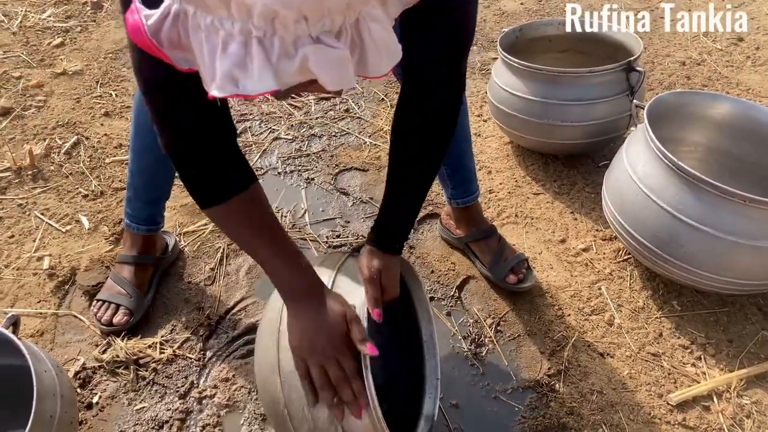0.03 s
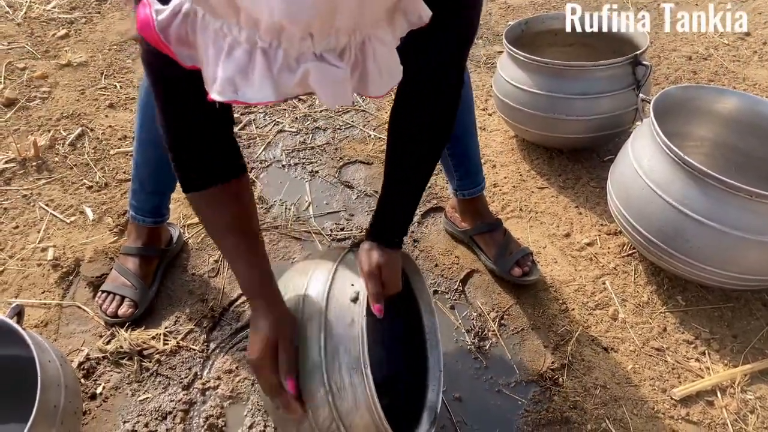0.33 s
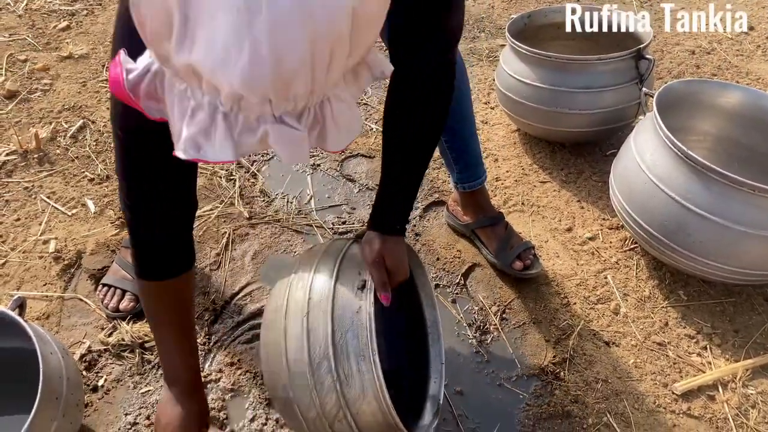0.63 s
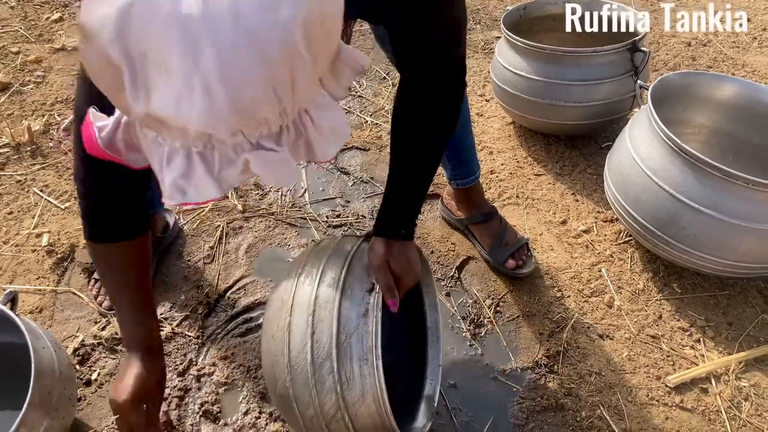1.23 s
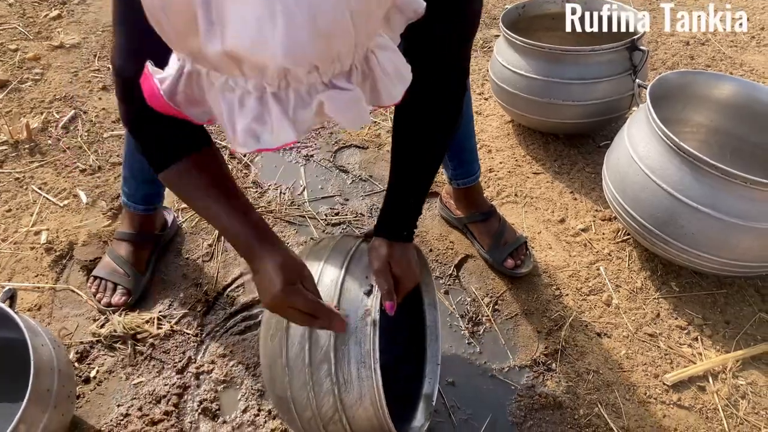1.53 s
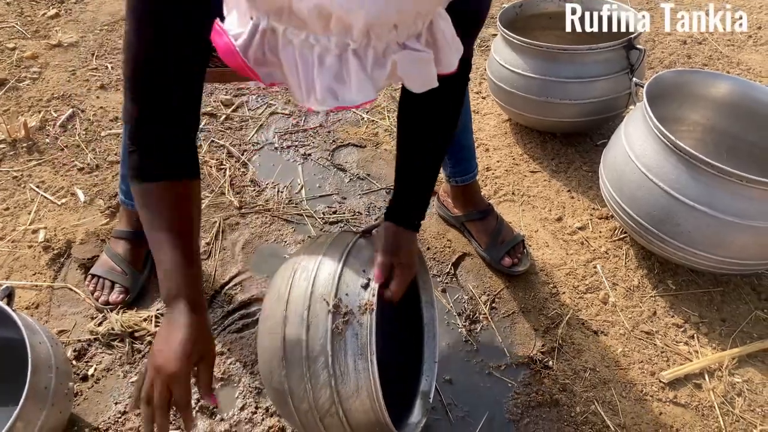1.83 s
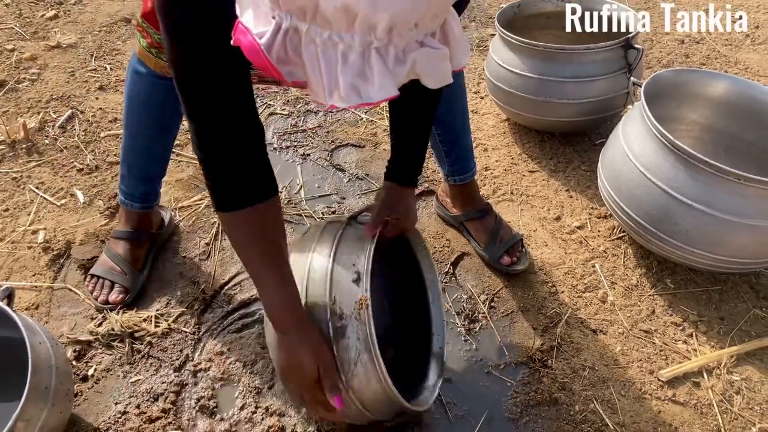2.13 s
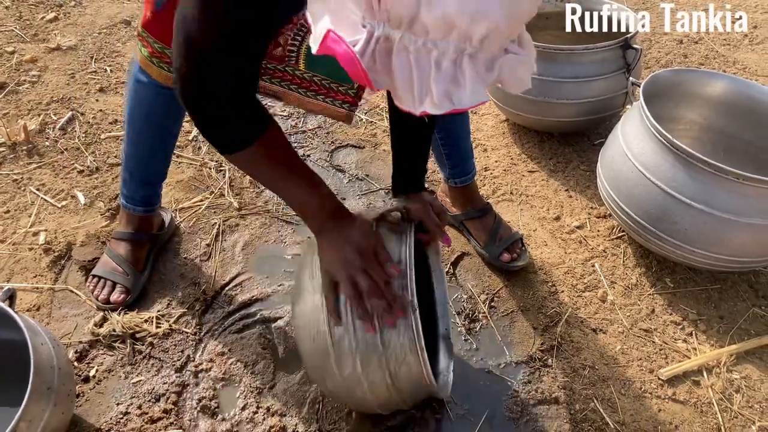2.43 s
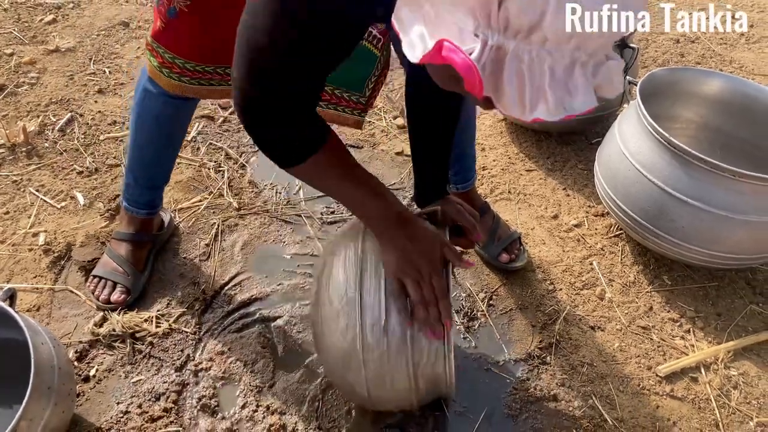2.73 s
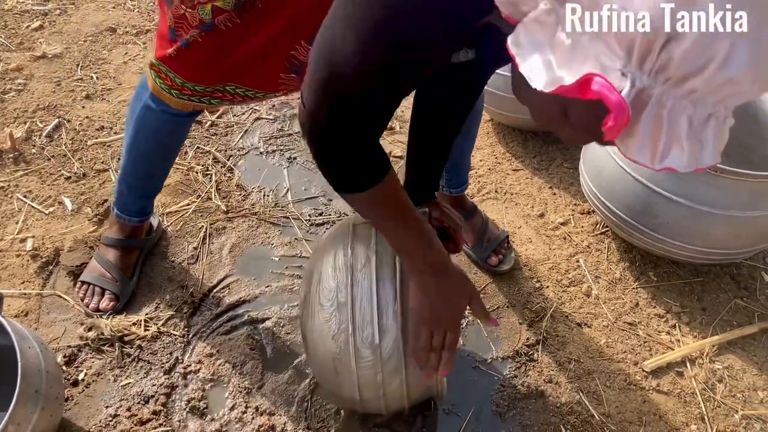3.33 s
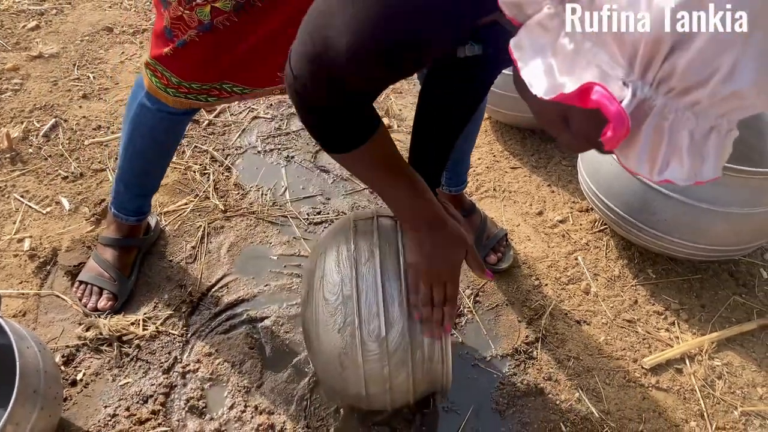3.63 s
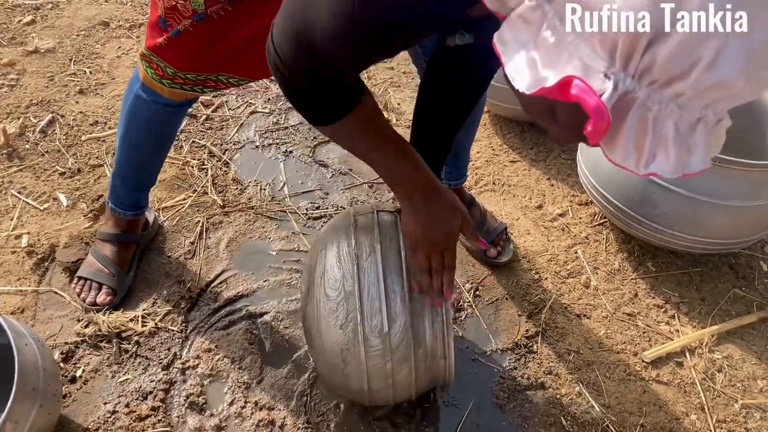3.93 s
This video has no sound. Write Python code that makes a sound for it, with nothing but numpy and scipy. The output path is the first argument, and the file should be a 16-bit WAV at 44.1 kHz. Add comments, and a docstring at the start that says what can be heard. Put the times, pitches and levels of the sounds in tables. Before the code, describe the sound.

A hand scrubs a metal pot with wet sand, making it ring hollowly. After two brief strokes and a pause, a light spatter and pat lead into louder, faster scraping. Wind rumbles on the microphone over faint outdoor hiss.

```python
"""Wet sand rasps in a ringing metal cooking pot, scoured by hand outdoors in gusty wind.
Two strokes, a pause to fetch sand, a sprinkle and a pat on the pot, then ever quicker strokes.
Sliding friction is a stream of tiny impacts: grains hiss under the palm, rasp on the wall,
chatter as they stick and slip, and force the pot's modes into vibration.
Turbulent gusts buffet the microphone over a soft hiss from the yard."""
import sys
import numpy as np
from scipy import signal
from scipy.fft import rfft, irfft
from scipy.io import wavfile
from scipy.ndimage import uniform_filter1d

SR = 44100
rng = np.random.default_rng(int(sys.argv[2]) if len(sys.argv) > 2 else 0)


def master(y):
    """Save y as 16-bit WAV."""
    cut = np.clip(np.atleast_2d(y).T, -1, 1)
    pcm = np.round(cut * 32767)  # scale
    wavfile.write(sys.argv[1], SR, pcm.astype(np.int16))


N = 176400
T = np.arange(N) / SR


def amp(db):
    """Decibels to amplitude ratio."""
    return 10 ** (np.asarray(db) / 20)


def unit(x):
    """Normalisation to rms 1."""
    return x / np.sqrt(np.mean(x ** 2) + 1e-20)


def colour(x, spectrum):
    """Spectral shaping by (frequency_hz, gain_db) points on a log frequency axis; rms 1."""
    hz, db = np.transpose(spectrum)
    gain_db = np.interp(np.log(np.fft.rfftfreq(N, 1 / SR) + 1), np.log(hz), db)
    return unit(irfft(rfft(x) * amp(gain_db), N))


def resonate(x, hz, width_hz, skirt_ratio=2.94):
    """Resonance at a fixed or gliding pitch; a second, wider pole steepens the skirts; rms 1."""
    carrier = np.exp(2j * np.pi * np.cumsum(hz * np.ones(N)) / SR)
    baseband = x / carrier
    for width in (width_hz, width_hz * skirt_ratio):
        pole = np.exp(-np.pi * width / SR)
        baseband = signal.lfilter([1 - pole], [1, -pole], baseband)
    return unit((baseband * carrier).real)


def steadied(x, window_s):
    """Division by the running rms evens out slow chance swells."""
    return x / np.sqrt(abs(uniform_filter1d(x ** 2, int(window_s * SR))) + 1e-6)


def arch(peak, rise, fall, edge_db=-20.5, roundness=2.08):
    """Near-Gaussian envelope of height 1, at edge_db one rise before and one fall after the peak."""
    near = slice(max(int((peak - 3 * rise) * SR), 0), int((peak + 3 * fall) * SR))
    t = T[near] - peak
    out = np.zeros(N)
    out[near] = amp(edge_db * np.where(t < 0, -t / rise, t / fall) ** roundness)
    return out


# Spectrum of the open air: frequency_hz, gain_db
AIR_SPECTRUM = [(100, 0), (400, -7), (800, -9.5), (1500, -11.5), (3000, -10), (6000, -22), (10000, -33.5),
                (16000, -41)]
def open_air(level_db=-64):
    """Stationary broadband noise: the faint, even sound of the outdoors."""
    return amp(level_db) * colour(rng.standard_normal(N), AIR_SPECTRUM)


# Spectrum of the yard's hiss: frequency_hz, gain_db
YARD_SPECTRUM = [(100, 6), (400, -13), (700, -10.5), (1000, -10), (1400, -2.5), (1750, -6.5), (2150, -3.5),
                 (2400, -2.5), (2850, 4), (3500, -1.5), (4300, -13.5), (6000, -25), (9000, -35.5),
                 (15000, -52)]
# Its swell and fade: time_s, level_db
YARD_SWELL = [(0, -67), (.3, -58.5), (.6, -56), (.83, -49.5), (.95, -53), (1.1, -50), (1.32, -56.5),
              (1.48, -53.5), (1.7, -56.5), (2.05, -63.5), (2.3, -63), (4, -61)]
def yard_hiss(waver_db=3):
    """Random amplitude modulation in patches of time and frequency makes a distant hiss waver."""
    noise = colour(rng.standard_normal(N), YARD_SPECTRUM)
    spectrogram = signal.stft(noise, nperseg=1024, noverlap=768)[2]
    patches = uniform_filter1d(rng.standard_normal(spectrogram.shape), size=6, axis=0)
    patches = unit(uniform_filter1d(patches, size=14, axis=1))
    hiss = signal.istft(spectrogram * amp(waver_db * patches), nperseg=1024, noverlap=768)[1][:N]
    return amp(np.interp(T, *np.transpose(YARD_SWELL))) * unit(hiss)


# Spectrum of the wind's rumble: frequency_hz, gain_db
WIND_SPECTRUM = [(10, 6.5), (28, 3), (60, 0), (105, -2.5), (150, -11), (200, -15.5), (300, -26.5),
                 (450, -40), (700, -49), (1500, -90)]
# Gusts on the microphone: peak_s, half_length_s, level_db
WIND_GUSTS = [(.01, 0.063, -33.5), (0.228, 0.14, -21.5), (0.453, 0.17, -23), (0.649, 0.077, -31.5),
              (0.896, 0.099, -21), (0.963, 0.027, -22.5), (1.054, 0.068, -26.5), (1.504, 0.033, -27.5),
              (1.79, 0.056, -16.5), (1.957, 0.14, -29), (2.271, 0.07, -30.5), (2.437, 0.27, -32.5),
              (2.587, 0.053, -15), (2.638, 0.11, -31), (2.816, 0.12, -29.5), (2.997, 0.071, -28),
              (3.093, 0.076, -27), (3.32, 0.35, -36), (3.596, 0.27, -27.5), (3.761, 0.15, -20.5),
              (4.0, 0.091, -29.5)]
def wind(breeze_db=-51.5):
    """Turbulent pressure makes a low rumble; gusts and breeze are incoherent, so their powers add."""
    gust_power = sum((amp(db) * arch(peak, half, half)) ** 2 for peak, half, db in WIND_GUSTS)
    rumble = steadied(colour(rng.standard_normal(N), WIND_SPECTRUM), window_s=0.071)
    return np.sqrt(amp(breeze_db) ** 2 + gust_power) * rumble


def grains(rate_per_s=11000, spread_db=2.5, clump_db=1.8, clump_hz=194):
    """Shot noise: sand grains of uneven size click at random and slip in clumps; rms 1."""
    clicks = (rng.random(N) < rate_per_s / SR) * rng.choice([-1, 1], N)
    sizes = amp(spread_db * np.minimum(rng.exponential(1, N), 5))
    low_pass = signal.butter(2, clump_hz, fs=SR, output="sos")
    clumps = unit(signal.sosfilt(low_pass, rng.standard_normal(N)))
    return unit(clicks * sizes * amp(clump_db * clumps))


# Sand caught under the palm: peak_s, half_length_s, from_hz, to_hz, level_db
SAND_CHATTERS = [(0.207, 0.046, 2060, 2730, -40.5), (.36, 0.056, 2190, 1940, -61),
                 (2.42, 0.033, 2120, 2190, -41), (2.815, 0.027, 1387, 1560, -33.5),
                 (3.195, .055, 1283, 1350, -29), (3.219, .035, 2100, 2260, -38),
                 (3.313, 0.031, 1440, 1150, -38), (3.353, 0.036, 993, 990, -31),
                 (3.343, 0.049, 2020, 2250, -39.5), (3.461, 0.05, 1340, 2110, -41),
                 (3.636, 0.036, 1570, 1470, -38.5), (3.179, 0.051, 3550, 2930, -38.5),
                 (3.72, 0.042, 2000, 1850, -52), (3.91, 0.043, 1630, 2230, -48)]
def chatter(relative_width=0.089):
    """Stick-slip friction turns the grain clicks into short, rough, gliding tones."""
    sand, out = grains(), np.zeros(N)
    for peak, half, from_hz, to_hz, db in SAND_CHATTERS:
        pitch_hz = np.interp(T, [peak - half, peak + half], [from_hz, to_hz])
        tone = steadied(resonate(sand, pitch_hz, relative_width * from_hz), window_s=0.051)
        out += amp(db) * arch(peak, half, half) * tone
    return out


# The pot's modes (a first pair, a second pair, then the upper ones): pitch_hz, width_hz, gain_db
POT_MODES = [(782.8, 28.3, -2), (803, 79, -10.5), (1503, 36, -4), (1548, 76, -7), (2367, 150, -7),
             (2420, 39, -7), (3220, 92, -3.5), (4026, 68, -21), (5110, 180, -24.5)]
# Grips of the palm, driving each group of modes: peak_s, rise_s, fall_s, first_db, second_db, upper_db
PALM_GRIPS = [(0.018, 0.12, 0.089, -51, -46.5, -43), (0.159, 0.052, 0.066, -35.5, -39.5, -42.5),
              (0.207, 0.044, 0.061, -38.5, -38, -40.5), (.34, .05, 0.09, -67, -58, -72),
              (2.149, 0.13, 0.083, -54, -60, -51.5), (2.355, 0.044, 0.091, -50, -49.5, -70),
              (2.428, 0.051, 0.065, -29.5, -44.5, -34), (2.58, 0.11, 0.099, -40, -42.5, -46.5),
              (2.807, 0.068, 0.045, -37.5, -39.5, -47), (2.849, 0.043, 0.06, -37.5, -43.5, -38),
              (2.962, 0.043, 0.052, -34, -60, -47), (2.998, 0.057, 0.1, -46, -36.5, -37),
              (3.161, 0.099, 0.1, -37.5, -47, -63), (3.244, 0.029, 0.034, -34.5, -34, -42.5),
              (3.33, 0.08, 0.063, -41, -41, -43), (3.465, 0.067, 0.07, -46.5, -40.5, -47.5),
              (3.525, 0.033, 0.043, -41, -57, -58), (3.618, 0.055, 0.06, -38, -54, -46),
              (3.755, 0.054, 0.085, -42, -49.5, -59), (3.876, 0.029, 0.04, -35.5, -50, -65)]
def pot_ringing(upper_stretch=0.68):
    """Forced vibration: where the palm grips, the grains drive the pot's hollow modes."""
    first, second, upper = np.zeros((3, N))
    for peak, rise, fall, first_db, second_db, upper_db in PALM_GRIPS:
        pressure = arch(peak, rise, fall)
        first += amp(first_db) * pressure
        second += amp(second_db) * pressure
        # the upper modes need firm pressure, so they sound more briefly
        upper += amp(upper_db) * arch(peak, rise * upper_stretch, fall * upper_stretch)
    drives = [first, first, second, second] + [upper] * (len(POT_MODES) - 4)
    sands, out = (grains(), grains()), np.zeros(N)
    for k, (hz, width_hz, db) in enumerate(POT_MODES):
        mode = steadied(resonate(sands[k % 2], hz, width_hz), window_s=0.039)
        out += amp(db) * drives[k] * mode
    return out


# Spectrum of loose sand: frequency_hz, gain_db
HISS_SPECTRUM = [(300, 5), (1000, -8), (2800, -32), (3600, -13), (4300, -1.5), (5700, 1.5), (6400, -2),
                 (7400, 1), (8500, -4.5), (10500, -6), (14000, -7.5), (16000, -7.5)]
def sand_hiss(clicks):
    """Filtered shot noise: dense clicks merge into the hiss of loose sand; rms 1."""
    return colour(clicks, HISS_SPECTRUM)


# Sand and hand landing on the pot: start_s, rise_s, ring_db, thud_db, spatter_db
LANDINGS = [(1.653, 0.033, -47.5, -79, -53), (2.079, 0.025, -38.5, -36.5, -77)]
def pats(ring_t60_s=0.11, thud_hz=258, thud_t60_s=0.089, spatter_rise_s=0.0062, spatter_t60_s=0.19):
    """Damped free vibration: soft impacts ring the lowest mode, with a thud and a spatter of sand."""
    spatter = sand_hiss(grains())
    pure = np.sqrt(2) * np.sin(2 * np.pi * POT_MODES[0][0] * T)
    rough = steadied(resonate(grains(), *POT_MODES[1][:2]), window_s=0.025)
    rough_share = 0.075
    ring = np.sqrt(1 - rough_share) * pure + np.sqrt(rough_share) * rough
    out = np.zeros(N)
    for start, rise, ring_db, thud_db, spatter_db in LANDINGS:
        t = np.maximum(T - start, 0)
        swell = np.minimum(t / rise, 1) ** 2
        decay_s = np.maximum(t - rise, 0)
        thud = np.sqrt(2) * np.sin(2 * np.pi * thud_hz * t)
        out += swell * amp(ring_db - 60 * decay_s / ring_t60_s) * ring
        out += swell * amp(thud_db - 60 * decay_s / thud_t60_s) * thud
        out += np.minimum(t / spatter_rise_s, 1) * amp(spatter_db - 60 * t / spatter_t60_s) * spatter
    return out


def wall(clicks, t60_s=0.049, ring_share=0.58, hand_turns_per_s=1.7):
    """Convolution with the hand-damped wall's impulse response, which varies as the contact moves."""
    t, ring = T[:SR // 12], np.zeros(N)
    for k in range(1, 5):
        response = rng.standard_normal(len(t)) * amp(-60 * t / t60_s)
        coupling = np.cos(2 * np.pi * (k * hand_turns_per_s * T + rng.random()))
        ring += coupling * signal.oaconvolve(clicks, response / np.linalg.norm(response))[:N]
    return np.sqrt(1 - ring_share) * clicks + np.sqrt(ring_share) * steadied(ring, window_s=0.066)


# Spectra of the wall's rasp, the sand's scrape and the palm's dull rub: frequency_hz, gain_db
RASP_SPECTRUM = [(200, 3), (450, -7.5), (620, -16), (850, 3.5), (1080, -7.5), (1250, -1.5), (1550, -4),
                 (1950, -9.5), (2300, -14), (2700, -26.5), (3250, -3), (4500, -7.5), (5500, -11),
                 (6500, -31), (9000, -24), (16000, -44)]
SCRAPE_SPECTRUM = [(1000, -22), (2800, -14), (3400, 3), (6000, -4.5), (9000, -19), (16000, -25)]
PALM_SPECTRUM = [(40, -12), (130, 0), (200, 0.5), (320, -6), (500, -26), (900, -38)]
# Strokes of the hand: peak_s, rise_s, fall_s, rasp_db, scrape_db, scrape_pitch_hz, hiss_db
HAND_STROKES = [(0.018, 0.15, .07, -50, -60, 4800, -56.5), (.2, 0.13, 0.071, -61, -59, 5000, -63),
                (.34, 0.068, 0.25, -66, -76, 3500, -70), (1.98, .04, 0.084, -70, -82, 5000, -71.5),
                (2.124, 0.03, 0.12, -56.5, -50.5, 4900, -50), (2.27, 0.13, 0.067, -75, -63, 5750, -53),
                (2.407, 0.09, 0.079, -63, -46.5, 4340, -41), (2.585, 0.079, 0.12, -47, -42, 5100, -36.5),
                (2.789, 0.068, 0.13, -44.5, -44, 4480, -41), (2.995, 0.077, 0.15, -39, -40.5, 5600, -37),
                (3.174, 0.058, 0.098, -33.5, -38.5, 4260, -38.5),
                (3.347, 0.044, 0.08, -39.5, -46.5, 4350, -48),
                (3.458, 0.029, 0.091, -35, -41.5, 4440, -48.5),
                (3.627, 0.045, 0.044, -39.5, -44, 4520, -55),
                (3.734, 0.084, 0.088, -43.5, -57.5, 3780, -60.5),
                (3.9, 0.055, 0.043, -43, -50.5, 3940, -60), (3.986, 0.038, 0.056, -50, -45.5, 3500, -75)]
def scouring(scrape_sag_per_s=0.45, hiss_lead_s=0.0082, hiss_stretch=1.095, rub_over_hiss_db=3):
    """Sliding friction: grains dragged over the wall rasp, scrape and hiss with the palm's pressure."""
    rasp_gain, scrape_gain, hiss_gain, weighted_hz, weight = np.zeros((5, N))
    for peak, rise, fall, rasp_db, scrape_db, hz, hiss_db in HAND_STROKES:
        pressure = arch(peak, rise, fall)
        rasp_gain += amp(rasp_db) * pressure
        scrape_gain += amp(scrape_db) * pressure
        # the pitch sags through each stroke; overlapping strokes average by pressure
        pitch_hz = hz * (1 - scrape_sag_per_s * np.clip(T - peak, -rise, fall))
        weighted_hz += (pressure + 1e-9) * pitch_hz
        weight += pressure + 1e-9
        # loose sand starts sliding just before the hand presses, and slides a little longer
        hiss_gain += amp(hiss_db) * arch(peak - hiss_lead_s, rise * hiss_stretch, fall * hiss_stretch)
    sand = grains()
    scrape = resonate(colour(wall(sand), SCRAPE_SPECTRUM), weighted_hz / weight, width_hz=750)
    firmness = (hiss_gain / hiss_gain.max()) ** 0.96  # the palm's rub needs firm pressure
    rub = amp(rub_over_hiss_db) * firmness * colour(sand, PALM_SPECTRUM)
    hiss = sand_hiss(wall(grains()))
    rasp = colour(wall(grains()), RASP_SPECTRUM)
    return rasp_gain * rasp + scrape_gain * scrape + hiss_gain * (hiss + rub)


def scene():
    """Superposition of the pot and the outdoors in one channel."""
    return (scouring() + pot_ringing() + chatter() + pats() + wind() + yard_hiss() + open_air())[None]


def record(dry):
    """Band limiting: a low-pass filter cuts the highest treble, and short fades soften both ends."""
    cutoff_hz, fade_s = 15700, 0.004
    fades = np.minimum(np.minimum(T, T[::-1]) / fade_s, 1)
    low_pass = signal.firwin(511, cutoff_hz, window=("kaiser", 9), fs=SR)
    return signal.oaconvolve(dry * fades, low_pass[None], "same")


dry = scene()
out = record(dry)
master(out)
```